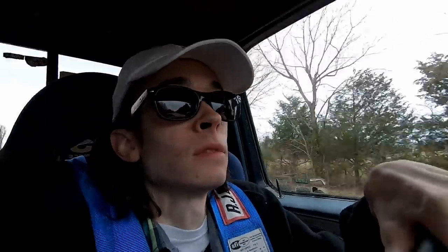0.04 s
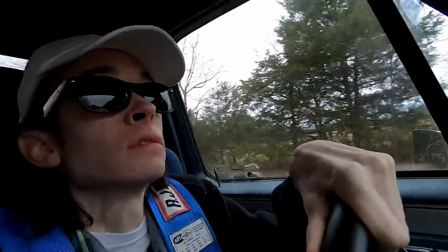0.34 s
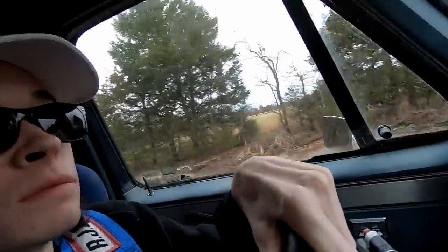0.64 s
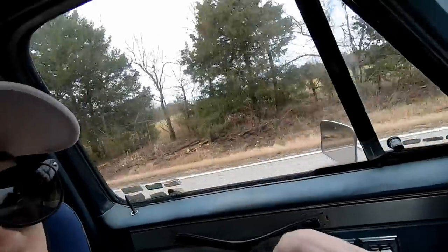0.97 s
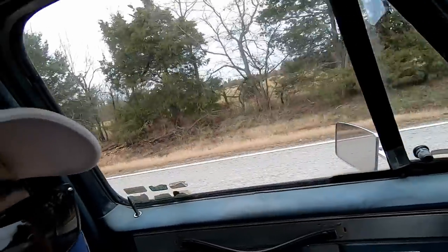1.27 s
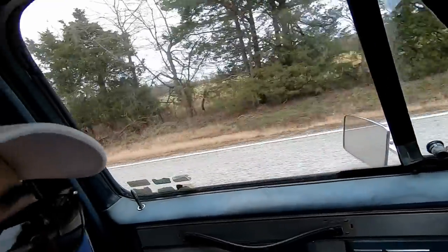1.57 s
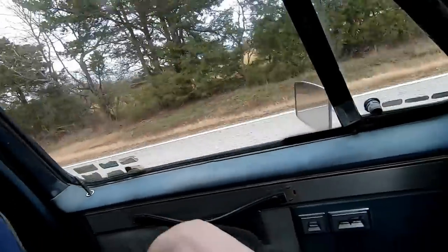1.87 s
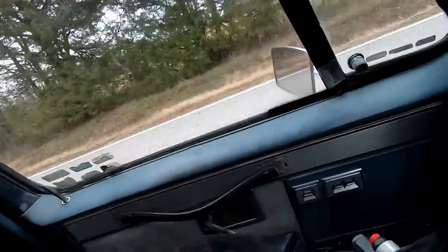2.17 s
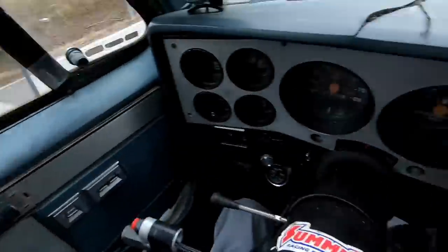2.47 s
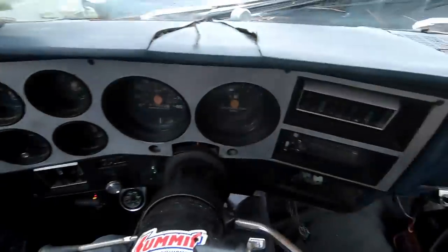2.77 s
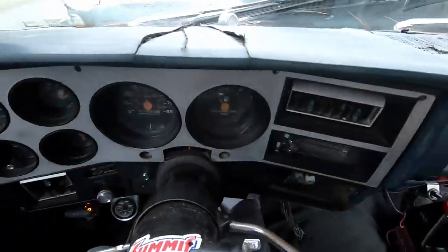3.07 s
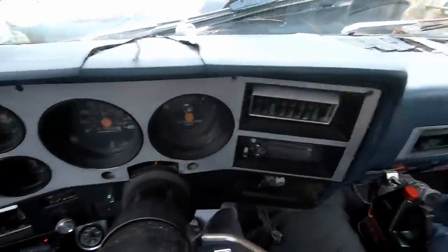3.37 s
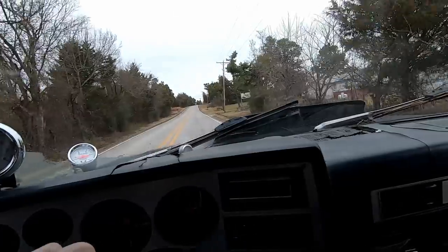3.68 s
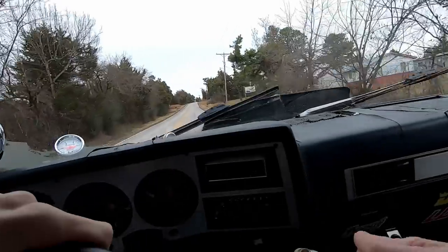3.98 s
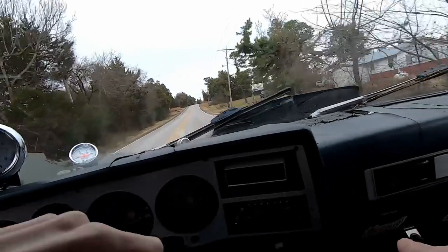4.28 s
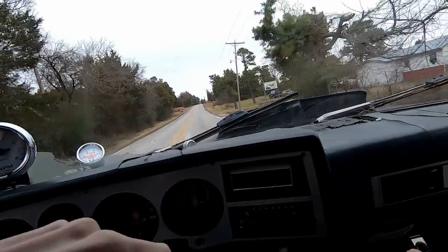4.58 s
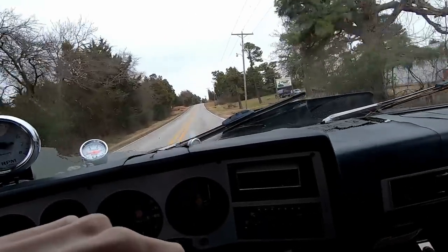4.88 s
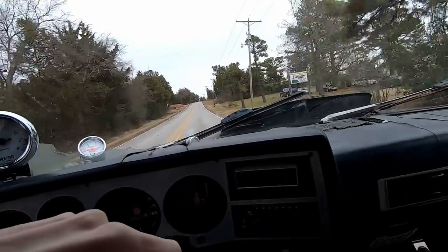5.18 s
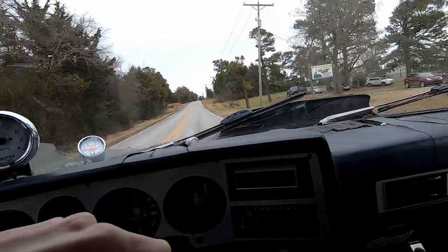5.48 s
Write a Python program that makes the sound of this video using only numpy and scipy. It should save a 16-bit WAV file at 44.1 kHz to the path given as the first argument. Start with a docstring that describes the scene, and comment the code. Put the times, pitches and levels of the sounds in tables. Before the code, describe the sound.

From the start, a loud V8 engine holds a steady cruising speed, heard inside a truck cab on a hand-held microphone. The throaty exhaust drones, burbles and booms over tyre roar, lumpy road rumble and faint wind hiss. A loose metal fitting clacks at about 0.3 seconds. Fingers knock and briefly rub on the microphone at about 1 and 1.9 seconds, with lighter taps near 2.1 and 2.8. Between 1 and 2 seconds the sound narrows from stereo to mono, and the drone shifts slightly in tone as the microphone moves. Small rattles and dry trim ticks come between 3.2 and 3.7 seconds, as the hiss fades. From about 4.8 seconds the throttle opens: the engine rises a little in pitch, the cab booms more, and the metal rattles and jingles repeatedly until the end, near 5.7 seconds.

```python
"""Inside a cruising V8 truck

The engine holds about 2150 rpm and picks up a little at the end. Its exhaust pulses drone, burble and
boom through the cab, over tyre roar, wind hiss and road rumble; a loose metal fitting rattles and trim
ticks. We listen from a hand-held camera, knocked by fingers as it turns from the driver past the door
to the dashboard, while its stereo image narrows to mono."""
import sys
import numpy as np
from scipy import signal
from scipy.fft import rfft, irfft
from scipy.io import wavfile
from scipy.ndimage import uniform_filter1d, minimum_filter1d

SR = 44100
rng = np.random.default_rng(int(sys.argv[2]) if len(sys.argv) > 2 else 0)


def transcribe(signal):
    """Save signal, clipped to [-1, 1], as a 16-bit WAV file at the path in sys.argv[1]."""
    frames = np.atleast_2d(signal).T
    limited = np.clip(frames, -1, 1)
    pcm = np.round(limited * 32767).astype(np.int16)
    wavfile.write(sys.argv[1], SR, pcm)


N = 253134
TIME = np.arange(N) / SR
BINS = np.fft.rfftfreq(N, 1 / SR)


# The camera's path. Each row: time in seconds, place (0 driver, 1 door, 2 instruments, 3 windscreen).
CAMERA_PATH = [(1.0, 0), (1.25, 1), (2.3, 1), (2.65, 2), (3.55, 2), (4.0, 3)]
# The mix at those four places. Each row: drone, burble, rasp and boom in relative dB, boom roughness
# from 0 to 1, roar in relative dB.
MIX_BY_PLACE = [(-11.5, -29.5, -45.5, -37, 1, -46.5), (-12, -26, -42, -29, 1, -49),
                (-11.5, -25.5, -39.5, -33.5, 1, -50), (-11.5, -26.5, -35.5, -36.5, 0.61, -51)]

def mix_at_camera():
    """The balance of the layers glides as the camera moves from place to place."""
    place, = curves(CAMERA_PATH)
    return [np.interp(place, np.arange(len(MIX_BY_PLACE)), column) for column in np.transpose(MIX_BY_PLACE)]


# Uneven combustion as the cab colours it. Each row: frequency in Hz, relative level in dB.
BURBLE_SPECTRUM = [(12, 8.5), (30, -8), (46, 11), (100, 7.5), (165, 4.5), (215, -1.5), (278, -4.5),
                   (330, -11.5), (450, -13), (540, -20), (900, -65)]
# The pipe and cab resonances. Each row: centre in Hz, width in Hz, relative level in dB.
PIPE_RESONANCES = [(490, 240, -16), (647.7, 39.6, 10), (770, 51, -3.5), (845, 350, -13.5)]

def exhaust(cycles, burble_db=5.0, rasp_db=-2.5, puff_s=0.0085, gas=0.76):
    """Each firing adds a puff of turbulent gas and rings the pipe, over the drone."""
    drone_level, burble_level, rasp_level, *_ = mix_at_camera()
    kicks = firings(cycles)
    puffs = unit(die_away(kicks, puff_s))
    burble = amp(burble_level + burble_db) * colour(puffs * diffuse_noise(), BURBLE_SPECTRUM)
    pipe = sum(amp(db) * resonance(hz, width) for hz, width, db in PIPE_RESONANCES)
    drive = unit(kicks) + gas * puffs * diffuse_noise()
    rasp = amp(rasp_level + rasp_db) * filtered(drive, pipe)
    return drone(cycles, drone_level) + burble + rasp


# The cylinders in firing order, strong and weak by turns. Each entry: strength in dB.
CYLINDER_STRENGTHS = [-1, 2.6, -3.2, 3.3, -2.6, 2.9, -1.1, 2.3]
# The same cylinders by bank. Each entry: 1 on the bank with the longer pipe, otherwise 0.
ON_LONG_PIPE = [1, 0, 0, 1, 0, 1, 1, 0]

def pulse_positions(first=.5405, pipe_lag=.0833):
    """Where in the two-turn cycle each pulse leaves the exhaust; the longer pipe delays its bank."""
    return first + np.arange(len(ON_LONG_PIPE)) / len(ON_LONG_PIPE) + pipe_lag * np.array(ON_LONG_PIPE)


def firings(cycles, scatter=0.12):
    """One kick a firing, no two burns quite alike."""
    kicks = np.zeros(N)
    for position, db in zip(pulse_positions(), CYLINDER_STRENGTHS):
        kicks[1:] += amp(db) * np.diff(np.floor(cycles - position))
    return kicks * (1 + scatter * rng.standard_normal(N))


def order_phase(cycles, order):
    """The running phase of one harmonic of the engine cycle, set by the eight pulses together."""
    pulses = np.sum(amp(CYLINDER_STRENGTHS) * np.exp(-2j * np.pi * order * pulse_positions()))
    return 2 * np.pi * order * cycles + np.angle(pulses)


# The drone's harmonics. Each row: multiple of the engine cycle, relative level in dB, place where a
# standing wave lifts or sinks it, lift in dB.
EXHAUST_ORDERS = [(2, -16.3, 0, -1.5), (3, -28, 0, 0), (4, -14, 0, -1), (5, -22.5, 1.5, 4), (6, -38, 2, -6),
                  (7, -39, 0, -10), (8, -22.7, 1.2, 3), (9, -29.3, .3, -5), (10, -33.5, 0, -14),
                  (11, -36.5, 1, -3), (12, -32, 0, -12), (13, -29.5, 3, -10), (14, -40, 1.7, -9),
                  (15, -45, 2, 4), (16, -35, 0, -1), (17, -48, 1.4, 15), (18, -44, 1.5, 5),
                  (19, -41.5, 2.7, -6), (20, -34.5, 1.8, -4), (21, -47, 0, 8), (22, -49, 1.5, 4),
                  (23, -41, 0, -7), (24, -43.5, 1, 3), (25, -45.5, 1, -4), (26, -46.5, 3, -7),
                  (36, -51, 0, 9)]

def drone(cycles, level_db, trim_db=0.1, waver_hz=4, thin_rpm=2187, thin_db_per_rpm=.55):
    """The steady hum of the eight pulses, shaped by the cab's standing waves."""
    rpm, = curves(ENGINE_SPEED)
    out = np.zeros(N)
    for order, db, wave_place, lift_db in EXHAUST_ORDERS:
        db = db + lift_db * nearness(wave_place)
        if order == len(ON_LONG_PIPE):  # the firing tone thins out as the speed rises
            db = db - thin_db_per_rpm * np.maximum(rpm - thin_rpm, 0)
        phase = order_phase(cycles, order)
        waver = .05 + .005 * order  # higher orders waver more
        tone = (1 + waver * wander(waver_hz)) * np.sin(phase)
        phase_drift = waver * wander(waver_hz) * np.cos(phase)
        out += amp(db) * (tone + phase_drift)
    return amp(level_db + trim_db) * unit(out)


# The throttle opens near the end. Each row: time in seconds, load from 0 to 1.
ENGINE_LOAD = [(4.75, 0.08), (5.1, 1)]

def boom(cycles, cab_hz=283, width_hz=24, puff_s=0.0021, full_load_db=9.5):
    """Regular firings and irregular puffs of exhaust set the cab's air booming, louder under load."""
    *_, level_db, roughness, _ = mix_at_camera()
    load, = curves(ENGINE_LOAD)
    puffs = die_away(firings(cycles), puff_s) * rng.standard_normal(N)
    ragged = filtered(puffs, resonance(cab_hz, width_hz))
    # twice the firing rate lies on the cab's resonance
    steady = unit(np.sin(order_phase(cycles, 2 * len(ON_LONG_PIPE))))
    return amp(level_db + full_load_db * load) * unit(roughness * ragged + (1 - roughness) * steady)


# The fitting's hardest shakes. Each row: start in seconds, level in dB, panel ring against that in dB.
SHAKES = [(.3203, -36.5, 2), (2.177, -45, -9), (3.183, -44.5, -3), (3.437, -38.5, -10), (3.4655, -44, -9),
          (3.5687, -41, -12), (4.89, -41.5, 8.5), (5.031, -38.5, 10.5), (5.046, -48, 8),
          (5.1711, -40.5, 11.5), (5.199, -50, 2), (5.3093, -41, 12), (5.3331, -46, 10), (5.381, -41, 9),
          (5.414, -43, -5), (5.4462, -44, 13), (5.5855, -46, 12), (5.6175, -48, -9), (5.683, -45.5, 10.5)]
# The fitting, the panel that holds it and a second loose piece of metal.
# Each row: frequency in Hz, relative level in dB, seconds to fade by 60 dB.
FITTING_MODES = [(2880, 2.5, .02), (3900, 8, 0.026), (4770, -3.5, .012), (5440, 3, .016), (5820, -6, .014),
                 (6470, -3, 0.048), (7560, -13, .015)]
PANEL_MODES = [(1020, 15, 0.06), (1530, 9, 0.014), (2082, -0.5, 0.081)]
JINGLE_MODES = [(2930, -6, .06), (5170, -6, .02), (5400, 0, .085), (5700, -6, .02), (6526, -3, .085)]

def rattle(clack_db=-1, settle_s=0.015, contacts_hz=2600, detune=0.014, jingle_rpm=(2174, 2192)):
    """The fitting clacks and rings on its panel; as the speed rises a second piece jingles along."""
    rpm, = curves(ENGINE_SPEED)
    clack_band = signal.butter(4, [2000, 7000], "band", fs=SR)
    out = np.zeros(N)
    for start, db, panel_db in SHAKES:
        contacts = flurry(contacts_hz, settle_s)
        pitch = 1 + detune * rng.uniform(-1.4, 1)  # never seated quite alike
        looseness = np.interp(np.interp(start, TIME, rpm), jingle_rpm, [0, 1])
        fitting = at_peak(ring(contacts, FITTING_MODES, pitch), 0)
        jingle = looseness * at_peak(ring(contacts, JINGLE_MODES), 0)
        panel = at_peak(ring(contacts, PANEL_MODES, pitch), panel_db)
        clack = at_peak(signal.lfilter(*clack_band, contacts), clack_db)
        add(out, start, amp(db) * (fitting + jingle + panel + clack))
    return out


def panel_buzz(base_db=-59.5, db_per_rpm=0.16, cruise_rpm=2160, touches_hz=300, spread_db=4):
    """Light random touches keep panel and fitting buzzing, louder above cruising speed."""
    rpm, = curves(ENGINE_SPEED)
    touches = rng.standard_normal(N) * (rng.random(N) < touches_hz / SR)
    level_db = base_db + db_per_rpm * np.maximum(rpm - cruise_rpm, 0) + spread_db * wander(11)
    return amp(level_db) * unit(ring(touches, PANEL_MODES + FITTING_MODES))


# Fingers on the camera. Each row: start in seconds, relative level in dB, rub strength against the blow,
# rub decay in seconds, low cut in Hz, high cut in Hz, pitch ratio of the case under that grip.
FINGER_KNOCKS = [(0.67, -42.5, 3, 0.0099, 1520, 3500, 1.26), (1.0167, -19.5, 0.34, 0.00091, 1130, 3000, 1),
                 (1.056, -38.5, 2.9, 0.0086, 2700, 3900, 1.03), (1.061, -33.5, 3, .01, 1100, 1400, 0.97),
                 (1.073, -35.5, 2.5, 0.0066, 2820, 3900, 1.04),
                 (1.9226, -22.5, 0.49, 0.0037, 1200, 2400, 0.993),
                 (1.9229, -30.5, 4.5, 0.0052, 4180, 14000, 1.03),
                 (1.9263, -23.5, 0.62, 0.0026, 1240, 4500, 1),
                 (2.135, -44.5, 1.5, .0012, 3200, 14000, 0.99),
                 (2.1495, -34.5, 1.1, 0.0015, 1450, 7000, 1.15),
                 (2.828, -33.5, 1.5, 0.0022, 1750, 12000, 1.14)]
# The camera's case. Each row: frequency in Hz, relative level in dB, seconds to fade by 60 dB.
CASE_MODES = [(1306, 0.5, 0.017), (1510, -5.5, 0.0066), (1890, -9.5, 0.015), (2240, -10, 0.014),
              (2874, -7.5, 0.015), (3520, -8.5, 0.01), (4350, -12.5, 0.0055), (6500, -15.5, 0.0054),
              (7600, -12.5, 0.0056), (8700, -18, 0.0051), (11800, -18, .003)]

def handling(knock_db=6.0, rocking=2.8, lean=0.39, rocking_hz=1650):
    """A fingertip lands on the camera's case, rings it and rubs for a moment."""
    t, out = TIME[:SR // 8], np.zeros((2, N))
    for start, db, rub, rub_s, low_hz, high_hz, pitch in FINGER_KNOCKS:
        fade = np.exp(-t / rub_s)
        push = rng.standard_normal(len(t)) * fade * (1 - fade)
        push *= rub / np.linalg.norm(push)
        push[0] = 1  # the blow itself
        # a soft touch wakes the low modes, a nail the high ones
        touch = np.vstack([signal.butter(10, low_hz, "high", fs=SR, output="sos"),
                           signal.butter(2, high_hz, "low", fs=SR, output="sos")])
        knock = at_peak(signal.sosfilt(touch, ring(push, CASE_MODES, pitch)), db + knock_db)
        # the case rocks in its lowest modes, so the left microphone port leads
        lows = signal.filtfilt(*signal.butter(4, rocking_hz, fs=SR), knock, padtype=None)
        highs = knock - lows
        leading_lows = -signal.hilbert(lows, 2 * len(t)).imag[:len(t)]
        side = lean * (lows - highs) + rocking * leading_lows
        add(out, start, np.array([knock + side, knock - side]))
    return out


# Small dry ticks. Each row: start in seconds, level in dB, pitch ratio of the piece.
TRIM_TAPS = [(1.6426, -46, 1.05), (3.295, -36.5, 1.13), (3.316, -35.5, 0.74), (3.72, -40, 0.96),
             (4.7457, -43, 1.18), (5.006, -38, 1.2)]
# The trim's ring. Each row: frequency in Hz, relative level in dB, seconds to fade by 60 dB.
TRIM_MODES = [(3300, 4, .008), (4020, 6, 0.024), (5640, 9, 0.0088), (6500, -6, 0.0084), (8000, -18, .005)]

def trim_ticks(contacts_hz=1200, settle_s=.003):
    """Pieces of trim tap as the cab flexes."""
    out = np.zeros(N)
    for start, db, pitch in TRIM_TAPS:
        add(out, start, at_peak(ring(flurry(contacts_hz, settle_s), TRIM_MODES, pitch), db))
    return out


# The tone of the roar and of the hiss. Each row: frequency in Hz, relative level in dB.
ROAR_SPECTRUM = [(200, 7.5), (550, 6), (850, 5), (1120, 1), (1600, -6), (2100, -8), (2850, -11),
                 (4200, -17), (5500, -22), (7500, -30.5), (10000, -49.5), (15000, -54.5)]
HISS_SPECTRUM = [(1500, -15), (4000, 6), (6000, -1.5), (8000, 2), (10000, -3), (15000, -7.5)]
# The hiss drops away, comes back at the second loud knock, then fades, as the microphone switches its
# wind mode. Each row: time in seconds, relative level in dB.
HISS_FADES = [(1.1, -56.5), (1.37, -67.5), (1.87, -66.5), (1.97, -56.5), (3.0, -59.5), (3.64, -68.5)]

def roar_and_wind(cycles, roar_db=11.5, full_load_db=2.2, hiss_db=1.0, gust_db=1.29, flutter_db=0.83):
    """Tyres and engine bay roar, throbbing a little with the cycle; wind hisses at the window seals."""
    load, = curves(ENGINE_LOAD)
    hiss_level, = curves(HISS_FADES)
    roar_level = mix_at_camera()[-1] + full_load_db * load
    gusts = gust_db * wander(12) + flutter_db * wander(70)
    throb = 1 - 0.032 * np.sin(2 * np.pi * cycles)
    roar = throb * standing_waves(colour(diffuse_noise(), ROAR_SPECTRUM))
    hiss = colour(diffuse_noise(), HISS_SPECTRUM)
    return amp(roar_level + roar_db + gusts) * roar + amp(hiss_level + hiss_db + gusts) * hiss


# The cab's standing waves in the roar. Each row: centre in Hz, width in Hz, place, lift in dB.
CAB_WAVES = [(840, 95, 1.7, 5), (1290, 63, 0.85, 6.5), (1350, 310, 0.98, -8)]

def standing_waves(x):
    """Bands swell or sink as the camera passes through the cab's standing waves."""
    spectrum = rfft(x)
    for hz, width, wave_place, lift_db in CAB_WAVES:
        band = irfft(spectrum * np.exp(-((BINS - hz) / width) ** 2), N)
        x = x + band * (amp(lift_db * nearness(wave_place)) - 1)
    return x


def road_rumble(level_db=-30, lump_db=3, hz=28, width_hz=14):
    """Bumps in the road shake the cab in lumps."""
    shaking = filtered(rng.standard_normal(N), 1 / (1 + ((BINS - hz) / width_hz) ** 4))
    return amp(level_db) * unit(shaking * amp(lump_db * wander(1.9)))


# How alike left and right sound. Each row: frequency in Hz, coherence from 0 to 1.
STEREO_LIKENESS = [(60, 1), (260, 1), (530, 0.69), (1100, 0.36), (4700, 0.45), (9700, 0)]

def diffuse_noise():
    """White noise from all sides, as two close microphone ports pick it up."""
    mid, side = rfft(rng.standard_normal((2, N)))
    likeness = across(STEREO_LIKENESS)
    mid, side = mid * np.sqrt(1 + likeness), side * np.sqrt(1 - likeness)
    return unit(irfft(np.array([mid + side, mid - side]), N))


def nearness(spot, reach=0.67):
    """How close the camera is to a spot along its path, from 0 to 1."""
    place, = curves(CAMERA_PATH)
    return np.exp(-((place - spot) / reach) ** 2)


def flurry(contacts_hz, settle_s):
    """A first contact and the random ones that die away after it."""
    t = TIME[:SR // 6]
    contacts = rng.standard_normal(len(t)) * (rng.random(len(t)) < contacts_hz / SR)
    contacts *= np.exp(-t / settle_s)
    contacts[0] = 1
    return contacts


def ring(x, modes, pitch=1):
    """Strikes a set of dying modes with x."""
    t = TIME[:SR // 8]
    body = sum(amp(db - 60 * t / t60) * np.sin(2 * np.pi * pitch * hz * t) for hz, db, t60 in modes)
    return signal.oaconvolve(x, body / np.linalg.norm(body))[:len(x)]


def wander(rate_hz):
    """A random drift of rms 1, up to about the given rate."""
    coarse = TIME[::128]
    hz = np.fft.rfftfreq(len(coarse), coarse[1])
    slow = irfft(rfft(rng.standard_normal(len(coarse))) / (1 + (hz / rate_hz) ** 4), len(coarse))
    return np.interp(TIME, coarse, unit(slow))


def die_away(kicks, decay_s):
    """Gives each kick an exponential tail."""
    return signal.lfilter([1], [1, -np.exp(-1 / (decay_s * SR))], kicks)


def resonance(hz, width_hz):
    """The response of one resonant peak."""
    return 1 / (1 + 1j * (BINS - hz) / width_hz) ** 2


def filtered(x, response):
    """Passes x through a frequency response; rms 1."""
    return unit(irfft(rfft(x) * response, N))


def colour(x, spectrum):
    """Shapes x with an EQ table; rms 1."""
    return filtered(x, amp(across(spectrum)))


def across(points):
    """A table over frequency, at every bin."""
    hz, value = np.transpose(points)
    return np.interp(np.log(BINS + 1), np.log(hz + 1), value)


def curves(rows):
    """Each column of a time table, at every sample."""
    seconds, *columns = np.transpose(rows)
    return [np.interp(TIME, seconds, column) for column in columns]


def amp(db):
    """Decibels to gain."""
    return 10 ** (np.asarray(db) / 20)


def unit(x):
    """Scales to rms 1."""
    return x / np.sqrt(np.mean(abs(x) ** 2) + 1e-20)


def at_peak(x, db):
    """Scales to a peak level."""
    return amp(db) * x / abs(x).max()


def add(mix, start_s, sound):
    """Mixes a sound in at its start time."""
    part = mix[..., round(start_s * SR):][..., :sound.shape[-1]]
    part += sound[..., :part.shape[-1]]


# The engine cruises, then picks up. Each row: time in seconds, speed in rpm.
ENGINE_SPEED = [(0, 2137.5), (.35, 2120), (.8, 2130.3), (2, 2135), (3.2, 2146.8), (4.1, 2149.7),
                (5, 2163.7), (5.6, 2211)]

def scene():
    """Engine, road and loose parts in the cab, with fingers on the camera."""
    rpm, = curves(ENGINE_SPEED)
    cycles = np.cumsum(rpm) / 120 / SR  # one engine cycle is two turns of the crankshaft
    driving = exhaust(cycles) + boom(cycles) + road_rumble() + roar_and_wind(cycles)
    return driving + rattle() + panel_buzz() + trim_ticks() + handling()


def limiter(x, ceiling_db=-4.0, release_db_per_s=90):
    """A fast limiter ducks both channels when their mean peaks over the ceiling."""
    over_db = np.maximum(20 * np.log10(abs(x.mean(0)) + 1e-6) - ceiling_db, 0)
    fall = TIME * release_db_per_s
    held_db = np.maximum.accumulate(over_db + fall) - fall
    widened_db = -minimum_filter1d(-held_db, size=200)
    return x / amp(uniform_filter1d(widened_db, size=200))


# The image closes to mono. Each row: time in seconds, side gain in dB.
STEREO_WIDTH = [(0, 1.5), (1.1, 2.5), (1.5, -12.5), (2.1, -41.5), (5.74, -50)]
# The microphone's top end falls away. Each row: frequency in Hz, relative gain in dB.
MIC_ROLL_OFF = [(9700, -1), (10600, -10), (15000, -19)]

def record(dry, gain_db=2.0, lean_right=.06, cutoff_hz=15700):
    """The stereo pair, leaning right, closes to mono; then top-end roll-off, limiter and low-pass."""
    width_db, = curves(STEREO_WIDTH)
    mid = dry.mean(0)
    side = amp(width_db) * ((dry[0] - dry[1]) / 2 - lean_right * mid)
    pair = np.array([mid + side, mid - side])
    dulled = irfft(rfft(pair) * amp(gain_db + across(MIC_ROLL_OFF)), N)
    low_pass = signal.firwin(511, cutoff_hz, window=("kaiser", 9), fs=SR)
    return signal.oaconvolve(limiter(dulled), low_pass[None], "same", axes=1)


dry = scene()
out = record(dry)
transcribe(out)
```